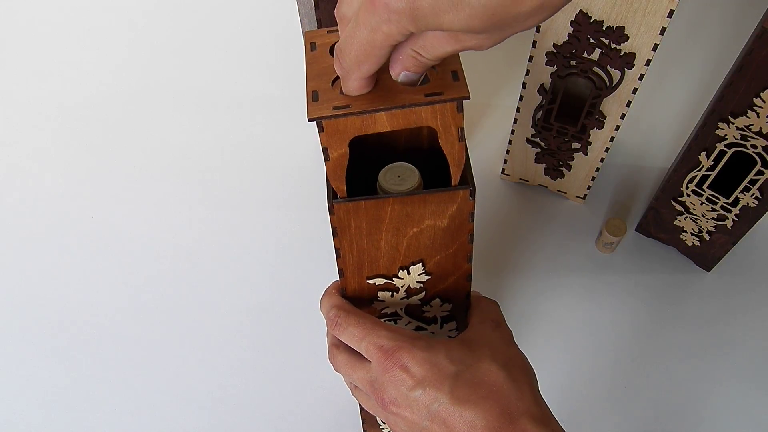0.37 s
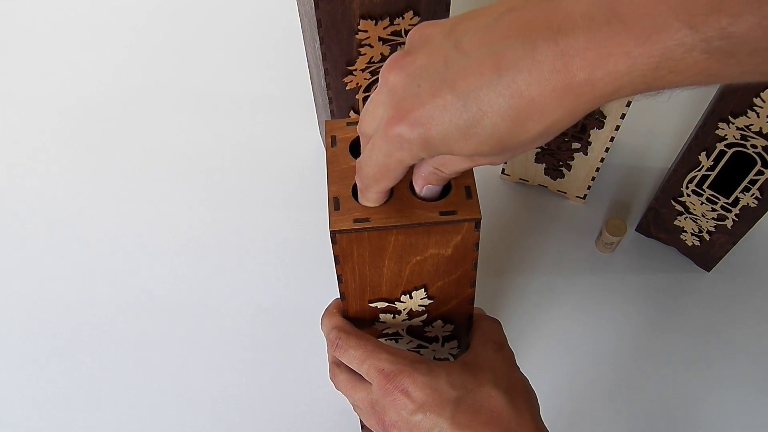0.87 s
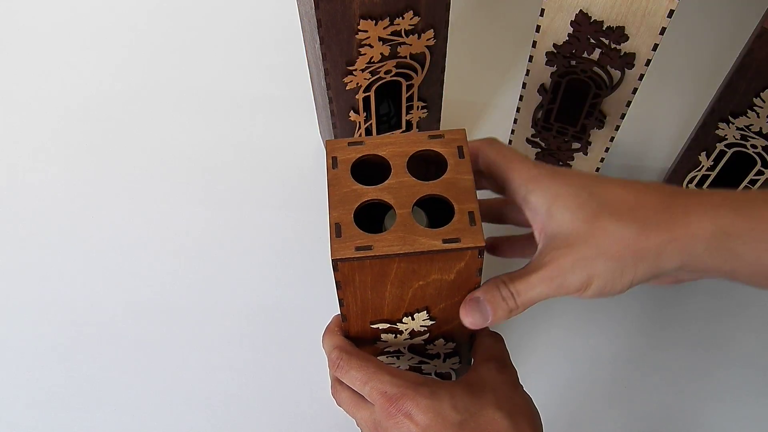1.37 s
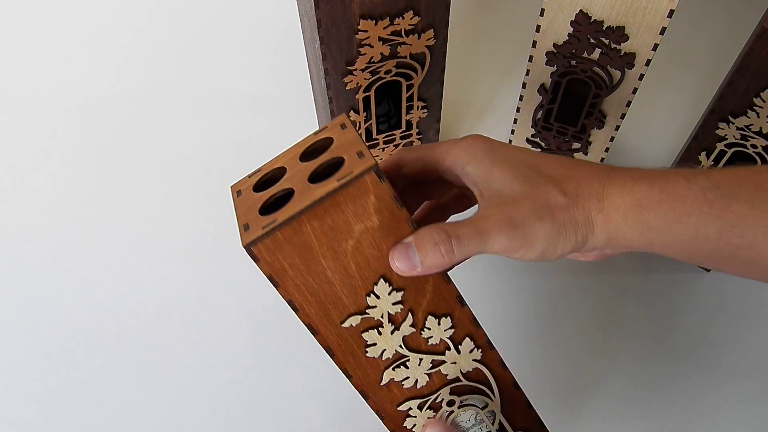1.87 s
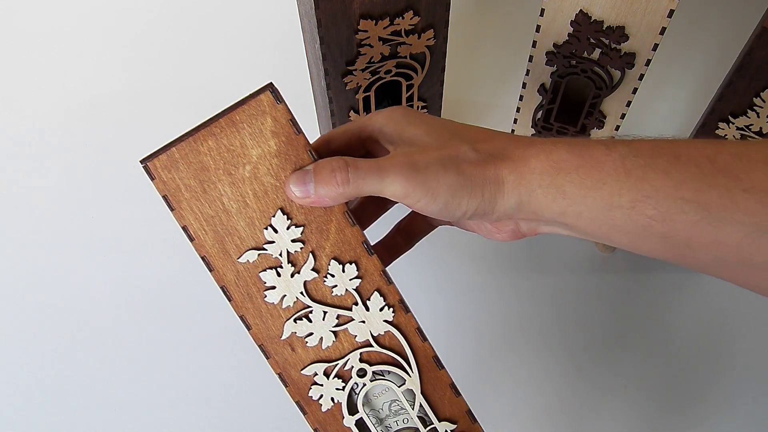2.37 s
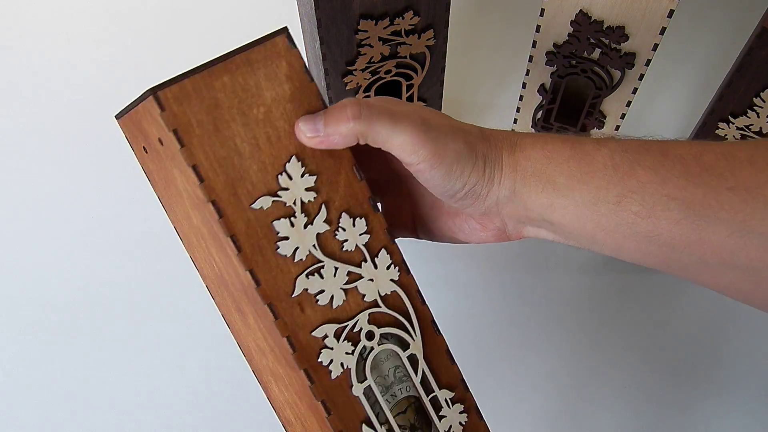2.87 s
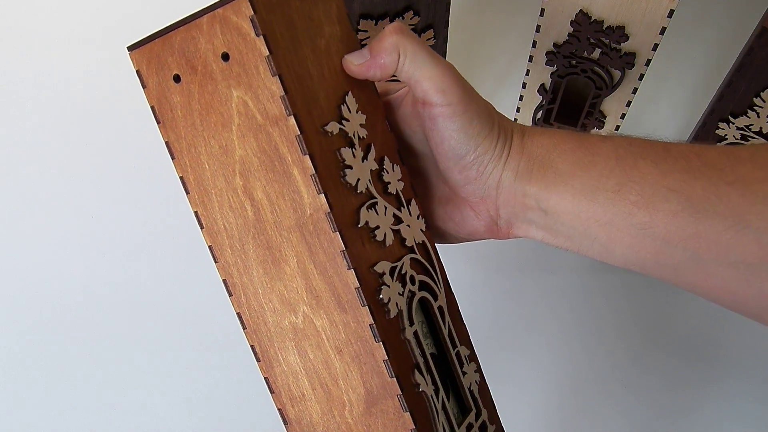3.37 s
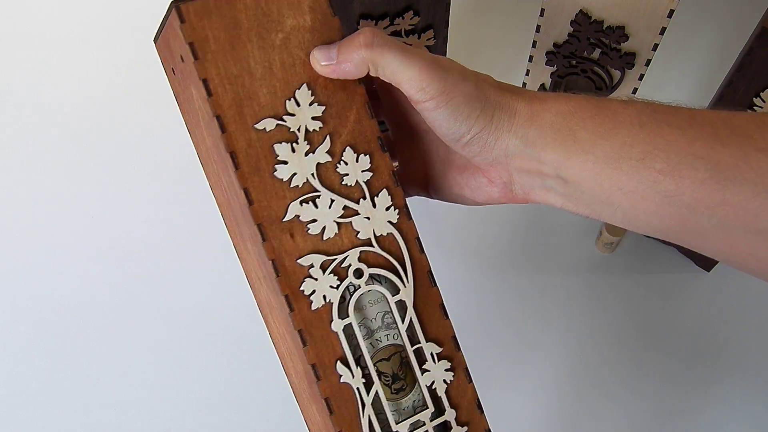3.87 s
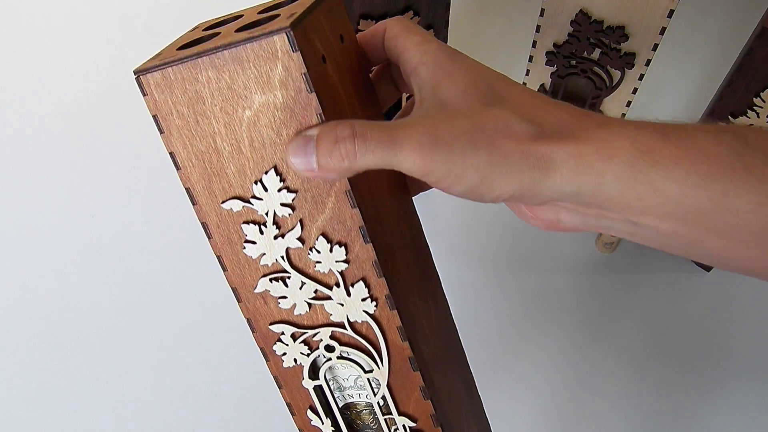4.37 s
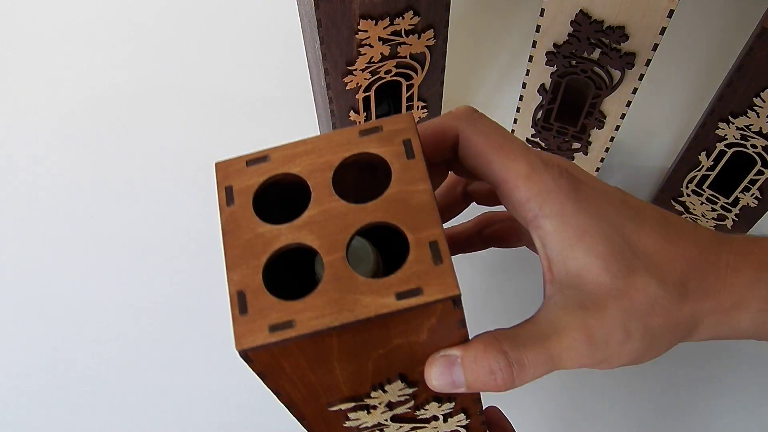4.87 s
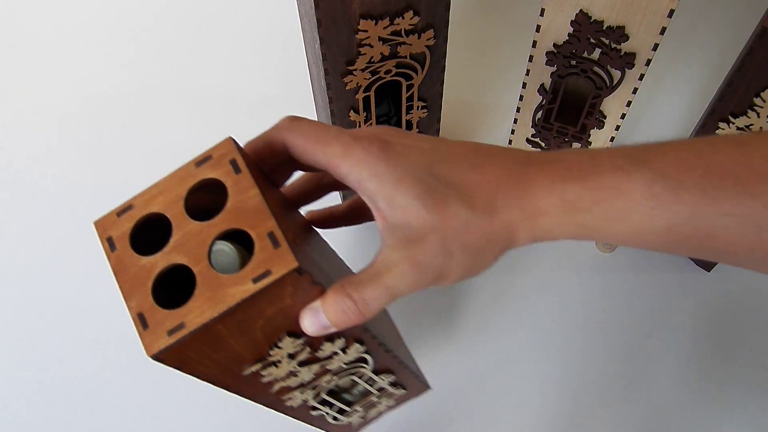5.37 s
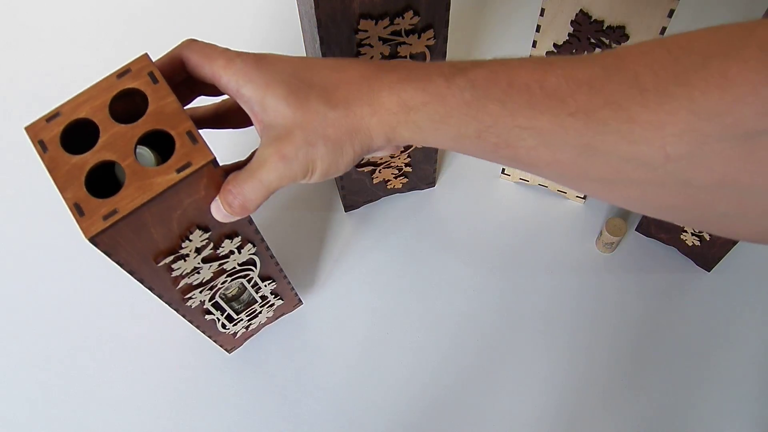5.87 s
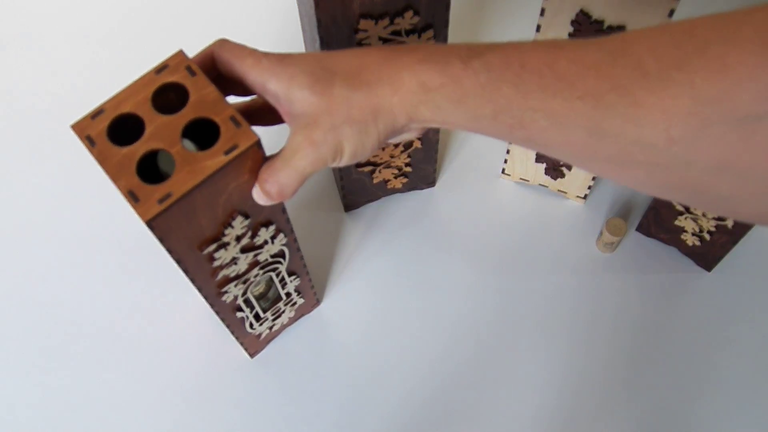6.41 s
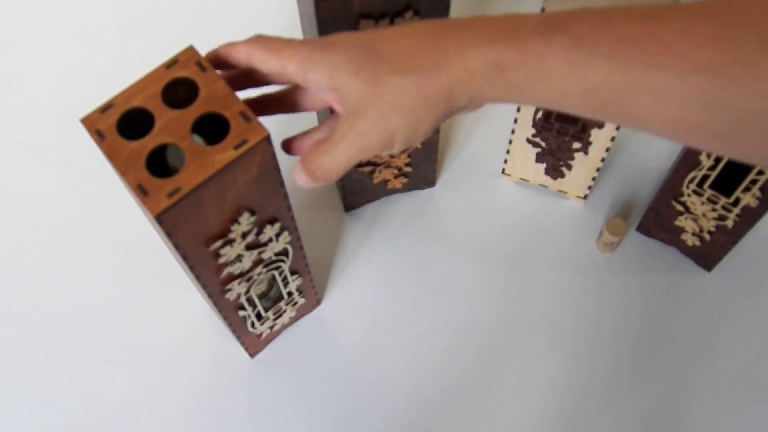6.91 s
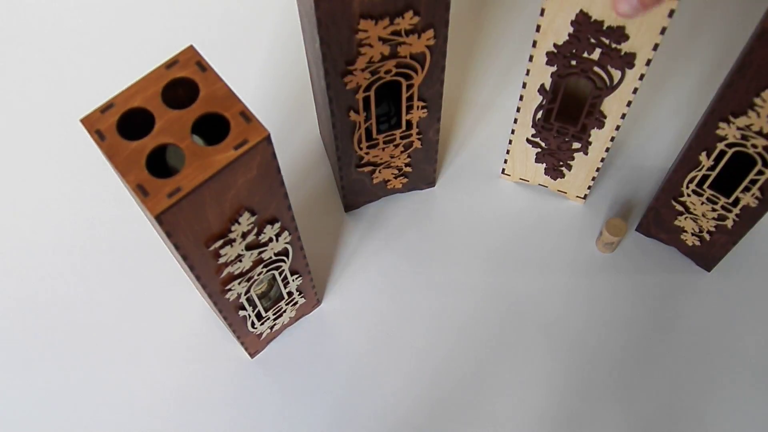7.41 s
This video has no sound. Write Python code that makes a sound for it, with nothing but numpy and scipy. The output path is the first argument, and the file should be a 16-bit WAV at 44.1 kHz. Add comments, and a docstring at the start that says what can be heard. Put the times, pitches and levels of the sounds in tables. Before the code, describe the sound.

Close up in a small hard room, a thin plywood box lid slides shut in a rapid stutter and ends in a hard knock. Light finger brushes follow, then the glass bottle inside slides and clunks against the walls as the box tilts. Dry skin rubbing leads to the box thumping onto a table with a short scrape. Low hum and faint hiss lie beneath.

```python
"""Bottle box on a table

Close take of a plywood bottle box handled on a table in a small hard room, heard at a phone's two microphone ports.
The lid slides shut with a judder, the bottle knocks and clinks on the walls as the box tilts, fingers and
wood rub, and the box lands with thumps. Blows ring damped modes, rubs are dense random clicks, cracks
are noise bursts. Two low hums, a distant rumble and microphone hiss lie under it."""
import sys
import numpy as np
from scipy import signal
from scipy.fft import rfft, irfft
from scipy.io import wavfile
from scipy.ndimage import uniform_filter1d

SR = 44100
rng = np.random.default_rng(int(sys.argv[2]) if len(sys.argv) > 2 else 0)


def transcribe(u):
    """Save the signal u as a 16-bit wav file named by the first command-line argument.

    u: samples, shape (n,) or (channels, n), limited to [-1, 1]; the rate is SR.
    q: integer samples, one column per channel.
    """
    v = np.clip(np.atleast_2d(u).T, -1, 1)
    q = np.round(v * 32767).astype(np.int16)
    wavfile.write(sys.argv[1], SR, q)


def gain_from_db(level_db):
    """Turn a decibel level (scalar or array-like) into a linear amplitude factor."""
    decades = np.asarray(level_db, float) / 20
    return 10 ** decades


N = 331632
T = np.arange(N) / SR
LEFT_RIGHT = np.array([[1], [-1]])  # opposite sign in the two ports


def colour(x, points):
    """Filter by (f/Hz, level/dB) points joined on a log axis, 20 dB lower beyond the end points."""
    hz, db = np.transpose(points)
    f = np.fft.rfftfreq(x.shape[-1], 1 / SR) + 1
    gain_db = np.interp(np.log(f), np.log(hz), db, left=db[0] - 20, right=db[-1] - 20)
    return irfft(rfft(x) * gain_from_db(gain_db), x.shape[-1])


def highpass(x, hz):
    """Second-order loss of bass, as from a body too small to radiate long waves."""
    return signal.sosfilt(signal.butter(2, hz, "highpass", fs=SR, output="sos"), x)


def unit(x):
    """Scale to rms 1."""
    return x / np.sqrt(np.mean(x ** 2))


def walk(rate):
    """Random levels held 1 / rate s and smoothed twice; spread near 1."""
    k = int(SR / rate)
    levels = rng.standard_normal(N // 100)
    held = levels[np.arange(N) // k]
    return 1.277 * uniform_filter1d(uniform_filter1d(held, k), k)


def add(out, s, x):
    """Mix x into out from time s."""
    i = int(s * SR)
    out[i:i + len(x)] += x[:N - i]


def ring(modes, push_s):
    """Damped modes after one half-sine push; a longer push dulls the upper ones."""
    hz, gain, t60 = modes
    t = T[:SR // 4, None]
    waves = np.sin(2 * np.pi * hz * t) * gain_from_db(-60 * t / t60)
    push = np.sin(np.pi * np.clip(T[:SR // 100] / push_s, 0, 1))
    return signal.fftconvolve(waves @ gain, push / push.sum())


def attack(x, db):
    """Scale x so that its first 7 ms have this rms level."""
    return x * gain_from_db(db) / np.sqrt(np.mean(x[:int(0.007 * SR)] ** 2))


# slow level change of hums, rumble, hiss and room: a sink just after the lid shuts, then a rise: t/s, level/dB
DIP = [(.725, -1.5), (.78, -8.5), (1.05, -8.5), (1.22, -6.5), (1.3, 1.5), (1.6, 7)]
# the drone settles upward: t/s, f/Hz
DRONE = [(.5, 87.2), (1.3, 89.5), (2.1, 93.1)]
# spectrum of the distant rumble: f/Hz, level per Hz/dB
RUMBLE = [(20, 2.5), (30, -8.5), (45, -25), (75, -10.5), (125, -10.5), (185, -14.5), (290, -17), (375, -5),
          (450, -12.5), (600, -16), (900, -24), (1600, -27), (2400, -39.5), (3900, -39.5), (6000, -52)]
# spectrum of the microphone hiss: f/Hz, level per Hz/dB
HISS = [(500, -6), (2500, -9), (3900, -7.5), (5000, -9.5), (8000, -2), (12000, 1), (16000, 3.5)]


def background():
    """A nearly steady hum beats against a drifting drone; rumble flickers; each microphone hisses alone."""
    hum_hz = 109.8 + 0.4 * walk(2.91)
    hum = gain_from_db(-52.5 + 1.0 * walk(8.9)) * np.sin(2 * np.pi * np.cumsum(hum_hz) / SR)
    drone_hz = np.interp(T, *np.transpose(DRONE)) + 1.25 * walk(9.8)
    turns = 2 * np.pi * np.cumsum(drone_hz) / SR
    octave = gain_from_db(-12) * np.sin(2 * turns)
    drone = gain_from_db(-56.5 + 2.7 * walk(7.)) * (np.sin(turns) + octave)
    mid, side = rng.standard_normal((2, N))
    # the ports hear nearly the same rumble except at the ends of the spectrum
    side = colour(side, [(30, -3), (100, -9.5), (300, -9.5), (700, -5), (1500, -2.0), (20000, 0)])
    rumble = unit(colour(mid + side * LEFT_RIGHT, RUMBLE)) * gain_from_db(-53 + 2.53 * walk(15.))
    hiss = gain_from_db(-61.5) * unit(colour(rng.standard_normal((2, N)), HISS))
    dip_db = np.interp(T, *np.transpose(DIP))
    distant = np.sqrt(2) * (hum + drone) + rumble  # sqrt(2) turns peak levels into rms
    return gain_from_db(0.3 * dip_db) * distant + gain_from_db(dip_db) * hiss


# box modes: f/Hz, level/dB, t60/s
BOX = [(347, -6, 0.057), (406, 0.5, 0.12), (450, -1.5, 0.12), (540, -1, 0.055), (598, -8, 0.069),
       (700, -3, 0.078), (765.6, -1.5, 0.08), (795, -7.5, 0.094), (834, -2, 0.066), (960, -1, 0.03),
       (1036, -6.5, 0.074), (1188, -10.5, .025), (1263, -2, 0.022), (1395, -1.5, 0.028), (1534, -1, 0.061),
       (1632, 1, 0.046), (1690, -4, 0.042), (1887, 2.5, 0.023), (2015, -6, 0.016), (2286, -10.5, 0.024),
       (2400, -8.5, 0.036), (2760, -11, 0.031), (2910, -16, .02)]
# modes that belong to the walls, the air cavity, low and high edge modes: above f/Hz, up to f/Hz
PARTS = [(560, 1200), (0, 560), (1200, 1470), (1470, 3200)]
# a lighter touch is a longer push: wall ring level/dB, push/s
PUSH = [(-57, 0.00057), (-42, 0.00016)]


def box_ring(part_dbs, chance):
    """Walls, cavity and edges ring by where the box is touched; the grip shifts each mode a little."""
    hz, db, t60 = np.transpose(BOX)
    # pairs of neighbouring modes move in opposite sense
    sense = (-1.) ** ((np.arange(len(hz)) + 1) // 2)
    modes = np.array([hz * (1 + 0.0098 * chance[0]), gain_from_db(db + 3.1 * chance[1]) * sense, t60])
    push_s = np.interp(part_dbs[0], *np.transpose(PUSH))
    out = 0
    for (low, high), part_db in zip(PARTS, part_dbs):
        part = modes[:, (low < hz) & (hz <= high)]
        out = out + attack(ring(part, push_s), part_db)
    return out


def grains(per_s, spread_db):
    """Dense clicks of uneven size, as when rough fibres catch and let go."""
    size = gain_from_db(spread_db * rng.exponential(size=N)) * rng.standard_normal(N)
    return size * (rng.random(N) < per_s / SR)


# how rubbing shakes walls, cavity, low and high edge modes: level/dB each
RUB_RING = (0, -1.5, -9, -10)
# spectrum of wood grit, also of cracks: f/Hz, level/dB
GRIT = [(1500, -15), (2100, -4), (2600, -5.5), (3200, -1.5), (3900, -0.5), (4500, -2), (5500, -5),
        (7000, -10), (9000, -26)]
# spectrum of grit under skin: f/Hz, level/dB
SKIN = [(1500, -6), (2400, -6.5), (3300, -4), (3900, -2), (4600, 0.5), (5500, -1.5), (7000, -6),
        (8500, -17), (10000, -17)]
# spectrum of fine grit, also of crack tops: f/Hz, level/dB
FINE = [(5000, -19), (6500, -5.5), (8500, 0), (11000, -4.5), (14000, -9.5), (17000, -14)]
# spectrum of the lid's fine grit in its groove: f/Hz, level/dB
GROOVE = [(3500, -25), (5000, -9), (6500, -1.5), (8000, -2), (10500, -6), (14000, -13), (17000, -18)]


def rubbed_wood():
    """Catching fibres shake the box walls; finer ones are heard directly as grit."""
    shaken = signal.fftconvolve(grains(1800., 1.94), box_ring(RUB_RING, np.zeros((2, 1))))[:N]
    walls = unit(shaken) * gain_from_db(2.34 * walk(60.))
    catch = grains(6000., 1.7) * gain_from_db(3.2 * walk(110.))
    soft = grains(14000., 1.1) * gain_from_db(1.5 * walk(160.))
    grit = unit(colour(catch, GRIT))
    skin, fine, groove = (unit(colour(soft, points)) for points in (SKIN, FINE, GROOVE))
    return walls, grit, skin, fine, groove


def stroke(s, dbs):
    """Gains of the three rubbing layers along a path of levels, faded over 11 ms at both ends."""
    fade = np.clip(np.minimum(T - s[0], s[-1] - T) / 0.011 + .5, 0, 1)
    return fade * gain_from_db(np.array([np.interp(T, s, db) for db in dbs]))


def strokes(table, rumble_db, layers):
    """Each rub swells to a peak and falls; wall rumble follows the grit, rumble_db above it."""
    swell_db = np.array([-12.5, 0, -12.5])  # both ends against the peak
    gain = 0
    for s, rise, fall, grit_db, fine_db in table:
        peak_dbs = np.array([[grit_db + rumble_db], [grit_db], [fine_db]])
        gain = gain + stroke([s - rise, s, s + fall], swell_db + peak_dbs)
    return (gain * layers).sum(axis=0)


# wood drags on wood: peak t/s, rise/s, fall/s, grit level/dB, fine grit level/dB
DRAGS = [(.0, 0.042, .2, -56, -55.5), (1.454, 0.037, 0.28, -61, -64), (5.67, 0.097, 0.1, -54.5, -63),
         (6.225, 0.052, .17, -53, -74), (6.558, 0.057, 0.089, -57, -70), (6.675, .045, 0.056, -60.5, -74)]


def drags(walls, grit, fine):
    """Wood dragged on wood shakes the walls strongly under its grit."""
    return strokes(DRAGS, 10, (walls, grit, fine))


def panel_tones(table, swell_s):
    """Each event swells and fades softly on one panel tone, peaking after swell_s."""
    out = np.zeros(N)
    t = T[:SR // 20] / swell_s
    for (s, db, hz), turn in zip(table, rng.random(len(table))):
        tone = np.sin(2 * np.pi * (hz * T[:len(t)] + turn))
        add(out, s, gain_from_db(db) * t * np.exp(1 - t) * tone)
    return out


# faint taps: t/s, peak level/dB, f/Hz
TAPS = [(0.141, -45, 595), (1.208, -55, 568), (1.34, -47, 590), (2.742, -43, 590), (3.876, -44.5, 603),
        (4.593, -36, 720), (6.946, -47, 603), (7.079, -46, 576), (7.214, -46, 557)]


def taps():
    """Faint taps each ring one panel tone."""
    return panel_tones(TAPS, 0.0028)


# the lid slides shut in its groove: t/s, wall rumble level/dB, grit level/dB
LID = [(.485, -46, -64), (.506, -47.5, -55), (.543, -38, -43), (.579, -28.5, -41.5), (.616, -36, -47),
       (.652, -33, -45), (.689, -40, -41.5), (0.728, -35, -38)]


def lid(walls, grit, groove):
    """The lid's slide is one long stroke of wall rumble, grit and the groove's fine grit."""
    s, rumble_db, grit_db = np.transpose(LID)
    gain = stroke(s, (rumble_db, grit_db, grit_db - 2.5))
    return (gain * (walls, grit, groove)).sum(axis=0)


# table top modes: f/Hz, level/dB, t60/s
TABLE = [(70, -17, 0.065), (91, -0.5, 0.14), (113.7, 2.5, 0.17), (130, -15.5, 0.22), (156, -12.5, 0.17),
         (240, -9.5, 0.11)]
# the box lands on the table top: t/s, peak level/dB
LANDINGS = [(.509, -33.5), (0.573, -32.5), (6.195, -17), (6.244, -21.5), (6.311, -30.5), (6.533, -28),
            (6.584, -34), (6.62, -36)]


def landings():
    """The table top booms under a soft, long push, with its deepest bass taken away."""
    out = np.zeros(N)
    hz, db, t60 = np.transpose(TABLE)
    boom = highpass(ring((hz, gain_from_db(db), t60), 0.0041), 69)
    for s, peak_db in LANDINGS:
        add(out, s, gain_from_db(peak_db) * boom / np.abs(boom).max())
    return out


# the lid catches and slips in its groove: t/s, peak level/dB, f/Hz
JUDDERS = [(.531, -32, 630), (.554, -31, 800), (.572, -23.5, 750), (.583, -21.5, 780), (.599, -18.5, 770),
           (.619, -29, 780), (.638, -26.5, 800), (.645, -31, 820), (.66, -31, 834), (.673, -24, 625),
           (.686, -34, 700), (.707, -27, 600)]


def judders():
    """Each slip of the lid sounds one panel tone."""
    return panel_tones(JUDDERS, 0.0026)


def blows(table, scatter):
    """Each blow rings the box and spits a short crack of fibres, its top in finer grit."""
    out = np.zeros(N)
    grit, fine = (colour(rng.standard_normal(N), points) for points in (GRIT, FINE))
    t = T[:SR // 30]
    for (s, *part_dbs, crack_db, top_db, decay_ms), chance in zip(table, scatter):
        add(out, s, box_ring(part_dbs, chance))
        i = int(s * SR)
        burst = t ** 2 * np.exp(-t * 1000 / decay_ms)
        crack = attack(burst * grit[i:i + len(t)], crack_db)
        add(out, s, crack + attack(burst * fine[i:i + len(t)], top_db))
    return out


# knocks on the box, rms of the attack:
# t/s, wall ring level/dB, cavity ring level/dB, crack level/dB, crack top level/dB
KNOCKS = [(0.572, -43, -33, -44, -51), (0.582, -25.5, -48, -41, -58), (0.729, -25.5, -26, -27, -27.5),
          (.8, -48, -38.5, -68, -70), (.82, -41.5, -41, -65, -72), (1.435, -73, -64, -51.5, -62),
          (1.462, -46, -43, -51, -56), (1.53, -48, -46, -78, -69), (1.548, -80, -53, -52.5, -56),
          (1.859, -64, -59, -57.5, -66), (3.156, -50.5, -61, -52, -58.5), (3.285, -47.5, -53, -59, -68),
          (3.641, -53, -46, -54.5, -58), (4.283, -40, -39, -58, -64), (4.325, -45.5, -47, -76, -70),
          (5.525, -47.5, -49, -67, -61), (5.712, -47.5, -64, -73, -72), (6.1959, -43.5, -46, -45.5, -53),
          (6.198, -36, -22.5, -51, -57), (6.214, -46, -30, -49, -67), (6.243, -48, -32.5, -51, -70),
          (6.26, -38.5, -31.5, -46.5, -64), (6.271, -46, -50, -48.5, -48.5), (6.299, -43.5, -36, -61, -71),
          (6.549, -38, -36.5, -58, -72), (6.658, -43, -40, -64, -69), (6.705, -54, -60, -69, -66)]


def knocks():
    """Knocks ring walls, cavity and edges; the edge ring lies between wall ring and crack."""
    table = []
    for s, wall_db, cavity_db, crack_db, top_db in KNOCKS:
        edge_db = wall_db + 0.66 * (crack_db - wall_db) - 1.5
        table.append((s, wall_db, cavity_db, edge_db, edge_db, crack_db, top_db, 1))
    return blows(table, rng.standard_normal((len(table), 2, len(BOX))))


# fingers brush the wood: peak t/s, rise/s, fall/s, skin grit level/dB, fine grit level/dB
BRUSHES = [(1.0, .07, 0.039, -57, -56), (1.785, 0.06, .035, -59, -82), (1.855, .035, 0.041, -60, -67),
           (2.19, 0.046, 0.054, -58.5, -59.5), (3.16, 0.066, .02, -59.5, -72),
           (3.28, 0.13, 0.13, -60.5, -74), (3.65, 0.055, 0.14, -63, -81), (4.58, 0.048, .04, -56, -62),
           (4.635, 0.048, .03, -57, -57), (4.678, .04, 0.019, -50.5, -51),
           (4.727, .012, 0.031, -50.5, -56.5), (4.808, .04, 0.029, -53, -62),
           (4.853, 0.03, .016, -52.5, -53), (4.922, .035, 0.023, -53.5, -61),
           (4.985, 0.032, 0.023, -55, -62), (5.52, 0.058, 0.13, -52, -57.5)]


def brushes(walls, skin, fine):
    """Soft fingers give skin grit and hardly shake the walls."""
    return strokes(BRUSHES, -2.5, (walls, skin, fine))


def squeak():
    """One short squeak glides down with unsteady pitch and level."""
    start, end = 2.322, 2.39  # s
    hz = np.interp(T, (start, end), (1940, 1790)) * (1 + 0.025 * walk(200.))
    swell = np.sin(np.pi * np.clip((T - start) / (end - start), 0, 1))
    return gain_from_db(-53 + 6.6 * walk(120.)) * swell * np.sin(2 * np.pi * np.cumsum(hz) / SR)


# the bottle slides up to a wall: peak t/s, rise/s, fall/s, grit level/dB, fine grit level/dB
SLIDES = [(2.375, 0.055, .03, -52, -58), (2.858, 0.023, .022, -43.5, -43),
          (4.232, 0.038, 0.047, -44.5, -53)]


def slides(walls, grit, fine):
    """The sliding bottle rubs out grit and shakes the walls."""
    return strokes(SLIDES, 3, (walls, grit, fine))


# the bottle strikes a wall: t/s, wall ring level/dB, cavity ring level/dB, low edge ring level/dB,
# high edge ring level/dB, crack level/dB, crack top level/dB, crack decay/ms
BOTTLE = [(2.39, -36, -27, -44, -44.5, -44, -61, 0.95), (2.852, -44, -49, -49, -46, -40.5, -37, 2),
          (2.856, -39.5, -40, -41.5, -51, -47, -48, 1.), (2.927, -19.5, -28, -38, -28.5, -37.5, -47, 1.1),
          (4.2245, -35, -35.5, -53, -39, -33.5, -47, 1.1), (4.2276, -34, -23.5, -32, -45, -42, -62, 0.94),
          (4.271, -54, -39, -52, -49, -37, -36.5, 2.1), (4.275, -33, -33.5, -48, -51, -47, -65, 1.1)]
# glass modes: f/Hz, level/dB, t60/s
GLASS = [(3270, -16, 0.029), (3790, 2, 0.022), (4500, 7, 0.022), (6740, -15, .02), (8000, -14, .02)]


def bottle():
    """The bottle's blows ring the box, and 2 ms later the glass clinks on its own short modes."""
    scatter = rng.standard_normal((len(BOTTLE), 2, len(BOX)))
    out = blows(BOTTLE, scatter)
    hz, db, t60 = np.transpose(GLASS)
    for (s, *_, crack_db, _, _), chance in zip(BOTTLE, scatter):
        clink = ring((hz, gain_from_db(db + 4.2 * chance[1, :len(hz)]), t60), .0001)
        add(out, s + .002, attack(clink, crack_db - 3))
    return out


# reverberation of the small hard room: f/Hz, t60/s
ROOM_T60 = [(100, 0.48), (450, 0.57), (1000, 0.54), (4000, 0.53), (7000, 0.34), (10000, 0.18)]
# the echoes carry less bass: f/Hz, level/dB
ROOM_BASS = [(300, -5.5), (1000, -4), (2500, -2)]


def room(x):
    """Diffuse echoes, weak for the first 6 ms, fading band by band; the bass is much alike left and right."""
    t = T[:SR // 2]
    hz, t60 = np.transpose(ROOM_T60)
    tail = np.zeros((2, len(t)))
    for centre in 80 * 2. ** np.arange(8):  # octave bands, Hz
        edges = [centre / np.sqrt(2), centre * np.sqrt(2)]
        band = signal.butter(2, edges, "bandpass", fs=SR, output="sos")
        mid, side = signal.sosfilt(band, rng.standard_normal((2, len(t))))
        band_t60 = np.interp(np.log(centre), np.log(hz), t60)
        fall = gain_from_db(np.interp(centre, *np.transpose(ROOM_BASS)) - 60 * t / band_t60)
        tail += fall * (mid + min(centre / 2000.0, 1) * side * LEFT_RIGHT)
    tail *= np.clip((t - 0.0057) / 0.0036 + .4, .4, 1)
    tail /= np.sqrt(np.sum(tail ** 2) / 2)
    return gain_from_db(-7.5) * signal.fftconvolve(x[None], tail, axes=1)[:, :N]


# left port over right: f/Hz, level/dB
BALANCE = [(300, 1), (700, 2), (1400, -3.5), (2800, -4), (5000, 3.5), (9000, -1.5)]


def at_ports(near):
    """Near sounds reach the two ports unequally loud and, mostly in the treble, a little out of step."""
    f = np.fft.rfftfreq(N, 1 / SR)
    # a quarter turn whose size ripples along frequency
    turned = irfft(1j * np.sqrt(2) * np.cos(2 * np.pi * 0.000606 * f) * rfft(near), N)
    spread = colour(turned, [(200, -11), (1000, -12.5), (3000, -5.0), (10000, -4.5), (20000, -1)])
    ports = []
    for share in (.5, -.5):
        tilt = [(hz, share * db) for hz, db in BALANCE]
        ports.append(colour(near, [(1, 0)] + tilt + [(SR, 0)]))
    return np.array(ports) + spread * LEFT_RIGHT


def scene():
    """The box and the table sound close to the ports, the room answers, the background lies under."""
    under = background()
    walls, grit, skin, fine, groove = rubbed_wood()
    rubs = drags(walls, grit, fine) + lid(walls, grit, groove) + brushes(walls, skin, fine)
    rubs += squeak() + slides(walls, grit, fine)
    # a narrow box cannot radiate long waves
    box = highpass(taps() + judders() + knocks() + bottle() + rubs, 248)
    near = box + landings()
    room_gain = gain_from_db(0.29 * np.interp(T, *np.transpose(DIP)))
    return at_ports(near) + room(near) * room_gain + under


def roll_off(x):
    """The treble ends steeply here."""
    return signal.sosfilt(signal.butter(12, 16870, fs=SR, output="sos"), x)


# response of the microphone port: f/Hz, level/dB
PORT = [(1, -1.5), (2600, 0), (3300, -1), (3900, 3.5), (4700, 0), (6000, -0.5), (30000, -5)]


def record(dry):
    """The microphone ports lift one treble band; the microphones drop the deepest bass and the top."""
    heard = highpass(colour(dry, PORT), 65)
    mix = signal.sosfilt(signal.ellip(10, .2, 60, 15800, fs=SR, output="sos"), heard)
    return roll_off(mix)


dry = scene()
out = record(dry)
transcribe(out)
```